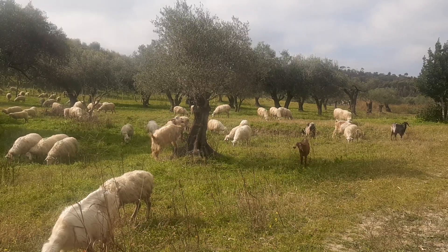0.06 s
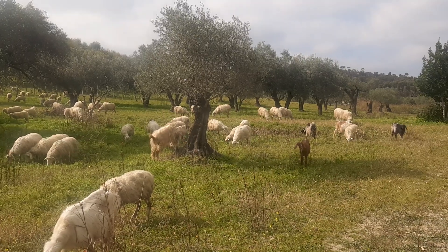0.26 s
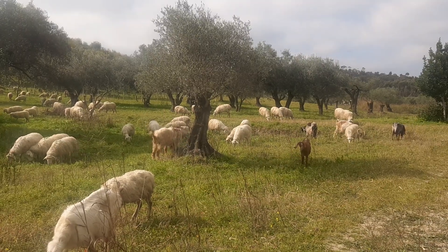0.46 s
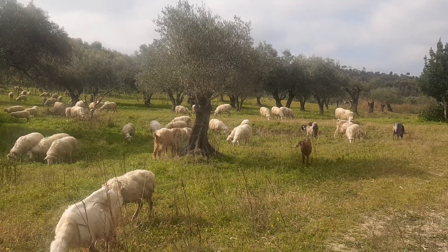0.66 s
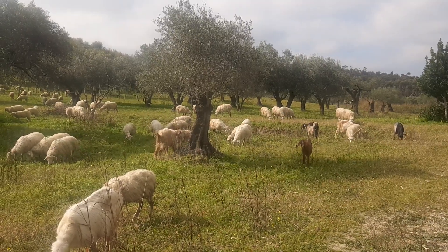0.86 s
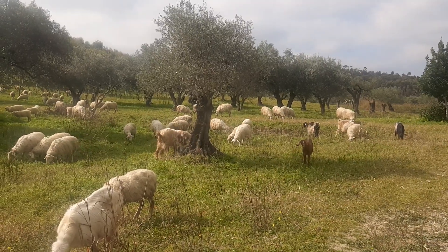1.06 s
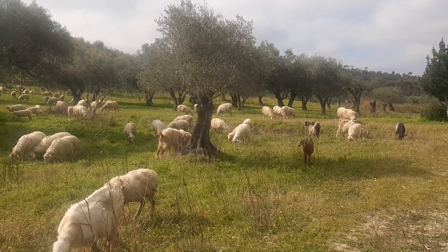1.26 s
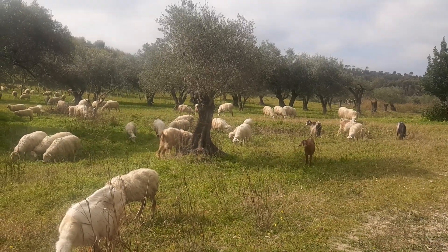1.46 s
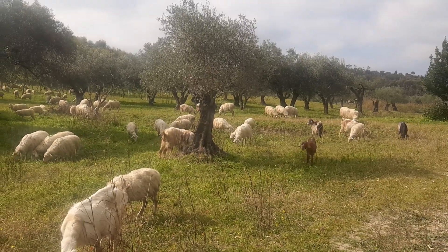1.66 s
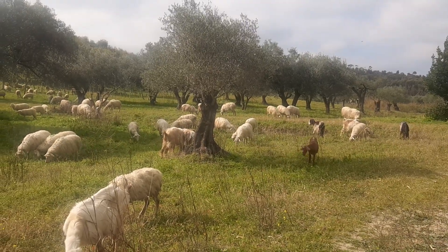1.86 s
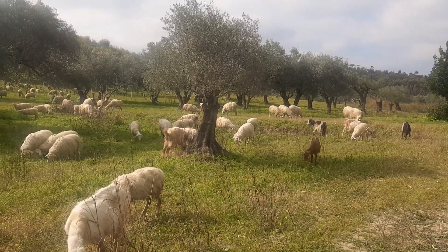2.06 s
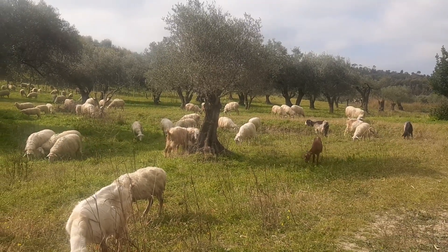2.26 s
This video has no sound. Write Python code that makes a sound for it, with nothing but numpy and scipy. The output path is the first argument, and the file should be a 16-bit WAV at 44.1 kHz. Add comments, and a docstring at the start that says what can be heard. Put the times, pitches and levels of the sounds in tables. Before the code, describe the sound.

A sheep's metal bell clanks irregularly close by over a softly rustling pasture.

```python
"""A sheet-metal bell on a grazing sheep, close to a stereo pair of microphones in an open olive grove.
It clanks six times, with one light rebound. Its modes come in close pairs that beat; the clapper
lands on a new spot each time and the wool damps the ring. Around it dry grass ticks, a sheep snorts
once and the pasture rustles softly, while light wind buffets the left microphone."""
import sys
import numpy as np
from scipy import signal
from scipy.fft import rfft, irfft
from scipy.io import wavfile
from scipy.ndimage import uniform_filter1d

SR = 44100
rng = np.random.default_rng(int(sys.argv[2]) if len(sys.argv) > 2 else 0)


def inscribe(sig):
    """Save sig as 16-bit PCM at rate SR to the path in sys.argv[1].

    A 1-D sig is mono; a 2-D sig holds one channel per row.
    Samples are clipped to [-1, 1] before scaling.
    """
    pcm = np.round(np.clip(np.atleast_2d(sig).T, -1, 1) * 32767)
    wavfile.write(sys.argv[1], SR, pcm.astype(np.int16))


N = 101429
TIME = np.arange(N) / SR

# clapper strikes: (time [s], change in wool damping [dB/s], first dip of the lowest pair's beat [s],
# clack level [dB], bright level [dB], bright tilt [dB/octave], level of each main mode [dB])
STRIKES = [ (0.2087, -48, 0.018, -34.5, -39.5, -2, (-41, -29.5, -56, -45, -40.5, -34.5, -36, -53, -38, -32.5)),
           (0.3462, -25, 0.022, -33.5, -40.5, -1.5, (-33, -29, -40, -50, -48, -32, -30, -48, -40, -40.5)),
           (0.5166, 39, 0.017, -22.5, -32.5, -5, (-34, -11, -28.5, -41, -24.5, -39, -19, -31.5, -51.5, -43)),
           (1.0836, 36.5, 0.0033, -36.5, -37.5, -0.5, (-30.5, -24, -31, -49.5, -35.5, -27, -36, -30.5, -48, -44.5)),
           (1.525, -5.5, 0.021, -37, -42, -1, (-33, -40, -37, -50, -49.5, -23, -35.5, -47, -40, -37.5)),
           (1.968, 9, 0.0067, -44.5, -49.5, -12, (-33.5, -26.5, -32, -45, -43.5, -33, -32, -48, -65, -40))]
# the bell's main modes, in pairs, one list each: (pitch [Hz], free decay [dB/s], left over right [dB])
MAIN_HZ = [850.5, 873.3, 2214, 2297, 4178.5, 4278, 4874, 5074, 5886, 6137]
MAIN_DECAY = [22.9, 120, 61.6, 28, 76, 68.3, 303, 135, 240, 246]
MAIN_SIDE = [0, -3, 4, 12, -14, -7.5, -14.5, -4, -3, -5.5]
# modes swelling or sinking as the bell turns: (time [s], half length [s], mode [Hz], change [dB])
SWELLS = [(0.431, 0.048, 4278, 8.5), (0.456, 0.028, 2214, -25.5), (0.506, 0.015, 4278, -9),
          (0.785, 0.033, 4178, 5.5), (1.69, 0.042, 4178, 8.5), (1.793, 0.16, 2297, 9.5),
          (2.22, 0.1, 4178, 12.5), (2.266, 0.12, 4278, -4.5)]
# short bright modes, one list each: (pitch [Hz], relative level [dB], left over right [dB])
BRIGHT_HZ = [6672, 6927, 6998, 7936, 8127, 8322, 10090, 11070, 11202, 12601]
BRIGHT_DB = [-16, -11.5, -10.5, -10, -6, -11.5, -8, -15, -9, -6]
BRIGHT_SIDE = [-23.5, -14.5, -8, 11.5, 5, 7, -13, -1, 16, 14.5]
# crowd of high thin-wall modes: (frequency [Hz], relative level [dB])
SHIMMER = [(9400, -25.5), (10000, -7), (11800, -14.5), (13300, -10), (14200, -17.5), (15000, -23)]
# spectrum of the clapper's clack: (frequency [Hz], relative level [dB])
CLACK = [(150, -28), (600, -10), (1200, 5), (1800, -7), (2550, 2), (3300, -26), (4900, 4), (7300, -9),
         (8200, 6.5), (9100, -8), (13500, 15.5), (16000, -16)]
# dry stalks snapping: (time [s], level [dB], centre [Hz], decay [s])
TICKS = [(0.185, -59, 4060, 0.0013), (0.617, -34.5, 5230, 0.00166), (.688, -38, 9100, 0.00056),
         (1.258, -55.5, 1500, 0.0032), (1.82, -46, 11000, 0.0011), (2.091, -43, 11100, 0.0017)]
# spectrum of the snort: (frequency [Hz], relative level [dB])
SNORT = [(60, -7), (150, 0), (230, -4.5), (350, 5.5), (480, -11.5), (1000, -12), (1500, -6), (2600, 0.5),
         (3100, -14.5), (5500, -12), (9000, -27.5)]
# wind buffets on the microphone: (peak time [s], half length [s], level [dB])
GUSTS = [(0.4, 0.014, -50.5), (0.479, 0.007, -33.5), (0.52, 0.021, -31.5), (1.736, 0.063, -48.5),
         (1.952, 0.058, -54), (2.153, 0.016, -44), (2.224, 0.018, -31), (2.277, 0.021, -25.5)]
# spectrum of the buffets: (frequency [Hz], relative level [dB])
WIND = [(10, -43), (25, -61), (42, 1.5), (62, -1.5), (100, -4), (150, -11), (250, -17.5), (400, -39),
        (3000, -83)]
# single thumps of air: (time [s], level [dB], pitch [Hz])
THUMPS = [(0.458, -20.5, 121), (.654, -29.5, 71.7), (1.737, -18.5, 67)]
# spectrum of the pasture's hush: (frequency [Hz], relative level [dB])
HUSH = [(25, 3), (80, 8.5), (300, -6.5), (600, 2), (1100, -9), (2300, -5), (3100, -12), (4300, -0.5),
        (7300, -2.5), (8800, -14.5), (11500, -5.5), (15500, -10.5)]
# rise and fall of the hush: (time [s], level [dB])
HUSH_LEVEL = [(0, -64), (.2, -65), (.42, -56), (.63, -47.5), (.75, -64), (1.05, -64.5), (1.3, -60.5),
              (1.55, -64), (1.75, -57), (2.1, -57), (2.3, -59)]
# stereo image of clapper, grass, snort and hush: (frequency [Hz], left over right [dB])
BALANCE = [(100, 3.5), (2300, 2), (4500, -9), (7000, -2.5), (9000, 3), (13000, 0.5)]

RISE_CYCLES, CHECK_S = 1.8, .002  # a mode builds up; a new strike stops the old ring
SWING_DB, SPOT_DB = 1.21, 6.5  # wobble as the bell swings; spread from the spot struck
MIC_LAG_S = 0.00014  # the right microphone hears the bell later
BRIGHT_PIVOT_HZ, BRIGHT_DB_PER_S, BRIGHT_DECAY_POWER = 8000, 220, 0.49
SHIMMER_DB_PER_S, SHIMMER_SIDE_DB = 334, 11.5
CLACK_S, REBOUND_S, REBOUND_DB = .004, .6435, -45
JANGLE_DB, JANGLE_DB_PER_S, JANGLE_FROM_HZ = -10, 600, 2400
GROVE_DB, GROVE_T60_S = -25, .55
TICK_OCTAVES = 0.45
SNORT_S, SNORT_RISE_S, SNORT_HOLD_S, SNORT_FADE_S, SNORT_DB = 2.005, 0.0017, 0.041, 0.039, -41.5
THUMP_CYCLES, WIND_CUT_HZ, WIND_RIGHT_DB = 0.26, 28.6, -36
HUSH_PATCH_DB = 1.8
BAND_LIMIT_HZ = 15900


def bell():
    """The bell, close by: each strike stops the old ring and starts the modes anew."""
    out, bright = np.zeros((2, N)), bright_modes()
    ends = [row[0] for row in STRIKES[1:]] + [N / SR]
    for (start, wool, dip, _, bright_db, tilt, levels), end in zip(STRIKES, ends):
        t = TIME[:round((end - start + 10 * CHECK_S) * SR)]
        phases = rng.uniform(0, 2 * np.pi, len(MAIN_HZ))
        # the lowest pair is in opposite phase at the dip
        phases[1] = phases[0] + np.pi - 2 * np.pi * (MAIN_HZ[1] - MAIN_HZ[0]) * dip
        main = zip(MAIN_HZ, levels, MAIN_DECAY, MAIN_SIDE, phases)
        ring = sum(mode(t, hz, db + swell(start + t, hz), decay + wool, side, phase)
                   for hz, db, decay, side, phase in main)
        for hz, db, side, decay in bright:
            spot_db = SPOT_DB * (2 * rng.random() - 1)
            level = bright_db + db + tilt * np.log2(hz / BRIGHT_PIVOT_HZ) + spot_db
            phase = rng.uniform(0, 2 * np.pi, (2, 1))
            add(ring, 0, mode(t[:SR // 5], hz, level, decay + wool, side, phase))
        overrun = np.maximum(t - (end - start), 0)
        add(out, start, ring * np.exp(-(overrun / CHECK_S) ** 2))
    return out


def mode(t, hz, db, decay, side_db, phase):
    """One dying partial of the bell as both microphones hear it."""
    rise = (1 - np.exp(-t * hz / RISE_CYCLES)) ** 2
    envelope = rise * amp(db - decay * t + SWING_DB * drift(t))
    mic_time = t - np.array([[0], [MIC_LAG_S]])
    return pan(side_db) * envelope * np.sin(2 * np.pi * hz * mic_time + phase)


def swell(time, hz):
    """Rise or fall of one main mode as the bell turns, in dB."""
    return sum(db * np.exp(-.5 * ((time - s) / half) ** 2) for s, half, near_hz, db in SWELLS
               if hz == min(MAIN_HZ, key=lambda f: abs(f - near_hz)))


def bright_modes():
    """The thin wall's high modes: (pitch [Hz], level [dB], left over right [dB], decay [dB/s])."""
    modes = [(hz, db, side, BRIGHT_DB_PER_S * (hz / BRIGHT_PIVOT_HZ) ** BRIGHT_DECAY_POWER)
             for hz, db, side in zip(BRIGHT_HZ, BRIGHT_DB, BRIGHT_SIDE)]
    low_hz, high_hz = SHIMMER[0][0], SHIMMER[-1][0]
    places = rng.random(size=24)
    for k, place in enumerate(places):
        hz = low_hz + (high_hz - low_hz) * (k + place) / len(places)
        modes.append((hz, read(SHIMMER, hz), SHIMMER_SIDE_DB, SHIMMER_DB_PER_S))
    return modes


def clapper():
    """A dry clack and a jangle of weak modes at each contact; a rebound tings after the hardest blow."""
    out, t = np.zeros((2, N)), TIME[:SR // 8]
    clack = noise(CLACK, sides=BALANCE)
    for start, _, _, db, *_ in STRIKES:
        age = np.maximum(TIME - start, 0)
        out += (TIME > start) * amp(db) * np.exp(-age / CLACK_S) * clack
        draws = rng.random(size=(30, 3))
        for k, (place, *turns) in enumerate(draws):
            hz = JANGLE_FROM_HZ * (BRIGHT_PIVOT_HZ / JANGLE_FROM_HZ) ** ((k + place) / len(draws))
            level = db + JANGLE_DB + read(CLACK, hz)
            phase = 2 * np.pi * np.c_[turns]
            add(out, start, mode(t, hz, level, JANGLE_DB_PER_S, read(BALANCE, hz), phase))
    ting = mode(TIME[:SR // 4], MAIN_HZ[6], REBOUND_DB, MAIN_DECAY[6], MAIN_SIDE[6], phase=0)
    add(out, REBOUND_S, ting)
    return out


def grove(clanks):
    """The clanks come back faintly, scattered by the ground and the trees farther off."""
    t = TIME[:SR]
    build_up = 1 - np.exp(-t / 0.043)
    tail = rng.standard_normal((2, SR)) * amp(-60 * t / GROVE_T60_S) * build_up
    return amp(GROVE_DB) * signal.fftconvolve(clanks, tail / np.linalg.norm(tail[0]), axes=1)[:, :N]


def grass():
    """Dry stalks snap under hooves and teeth."""
    out, t = np.zeros((2, N)), TIME[:4096]
    hz = np.fft.rfftfreq(len(t), 1 / SR)
    for start, db, centre_hz, decay in TICKS:
        octaves = np.log2((hz + 1) / centre_hz)
        colour = np.exp(-.5 * (octaves / TICK_OCTAVES) ** 2) * pan(read(BALANCE, hz))
        snap = unit(irfft(rfft(rng.standard_normal((2, len(t)))) * colour))
        add(out, start, amp(db) * np.exp(-t / decay) * snap)
    return out


def snort():
    """One short puff through a sheep's nose."""
    t = TIME - SNORT_S
    envelope = np.clip(t / SNORT_RISE_S, 0, 1) * np.exp(-np.maximum(t - SNORT_HOLD_S, 0) / SNORT_FADE_S)
    return amp(SNORT_DB) * envelope * noise(SNORT, alike=0.14, sides=BALANCE)


def wind():
    """Low buffets and three single thumps of air, almost all on the left microphone."""
    gust_power = sum((amp(db) * np.exp(-.5 * ((TIME - s) / half) ** 2)) ** 2 for s, half, db in GUSTS)
    eddies = noise(WIND)
    eddy_rms = np.sqrt(uniform_filter1d(eddies ** 2, size=1500, axis=1) + 1e-9)
    air = np.sqrt(gust_power) * eddies / eddy_rms
    for s, db, hz in THUMPS:
        cycles = np.clip((TIME - s) * hz, -10, 10)
        air += amp(db) * np.sin(2 * np.pi * cycles) / np.cosh(cycles / THUMP_CYCLES)
    low_cut = signal.butter(2, WIND_CUT_HZ, "high", fs=SR, output="sos")
    return signal.sosfilt(low_cut, air) * amp([[0], [WIND_RIGHT_DB]])


def hush():
    """Soft, patchy rustle of the pasture all around."""
    spectra = signal.stft(noise(HUSH, alike=0.2, sides=BALANCE), nperseg=256)[2]
    patches = uniform_filter1d(rng.standard_normal(spectra.shape[1:]), size=16, axis=0)  # in frequency
    patches = unit(uniform_filter1d(patches, size=4, axis=1))  # and in time
    rustle = signal.istft(spectra * amp(HUSH_PATCH_DB * patches), nperseg=256)[1][:, :N]
    return unit(rustle) * amp(np.interp(TIME, *np.transpose(HUSH_LEVEL)))


def noise(spectrum, alike=0., sides=None):
    """Stereo noise of a given colour, likeness between the microphones and balance."""
    hz = np.fft.rfftfreq(N, 1 / SR)
    left, other = rfft(rng.standard_normal((2, N)))
    right = alike * left + np.sqrt(1 - alike ** 2) * other
    coloured = np.array([left, right]) * amp(read(spectrum, hz))
    return unit(irfft(coloured * (pan(read(sides, hz)) if sides else 1), N))


def drift(t, count=24):
    """Slow random wander at each microphone."""
    knots = np.linspace(0, N / SR, count)
    return np.array([np.interp(t, knots, row) for row in rng.standard_normal((2, count))])


def amp(db):
    """Decibels to gain."""
    return 10 ** (np.asarray(db) / 20)


def unit(x):
    """Scales to rms 1."""
    return x / np.sqrt(np.mean(x ** 2) + 1e-20)


def read(points, hz):
    """Reads a table on a log-frequency axis."""
    f, value = np.transpose(points)
    return np.interp(np.log(hz + 1), np.log(f + 1), value)


def pan(db):
    """Left and right gains for a level difference."""
    return amp(np.array([[.5], [-.5]]) * db)


def add(mix, start, sound):
    """Mixes a sound in at a start time in seconds."""
    part = mix[:, round(start * SR):][:, :sound.shape[1]]
    part += sound[:, :part.shape[1]]


def scene():
    """The bell in the grove, with the small sounds around the microphones."""
    clanks = bell() + clapper()
    return clanks + grove(clanks) + wind() + grass() + snort() + hush()


def record(dry):
    """The recorder's band limit takes off the highest treble."""
    low_pass = signal.firwin(511, BAND_LIMIT_HZ, window=("kaiser", 9), fs=SR)
    return signal.oaconvolve(dry, low_pass[None], "same")


dry = scene()
out = record(dry)
inscribe(out)
```